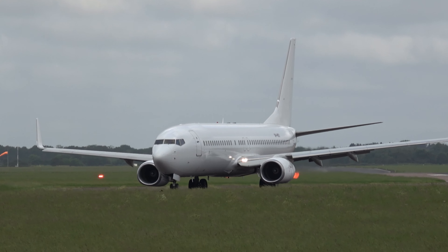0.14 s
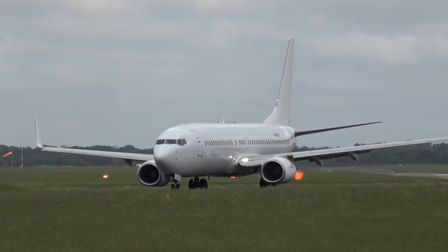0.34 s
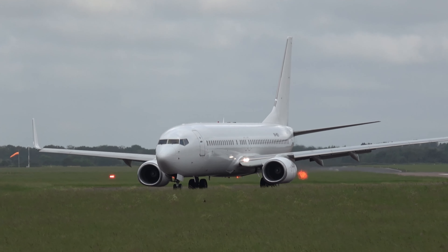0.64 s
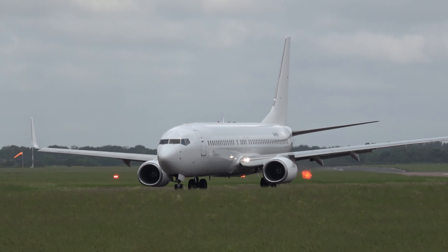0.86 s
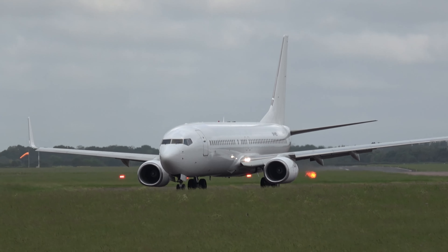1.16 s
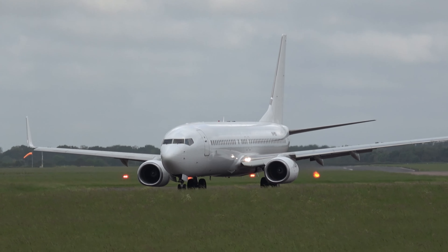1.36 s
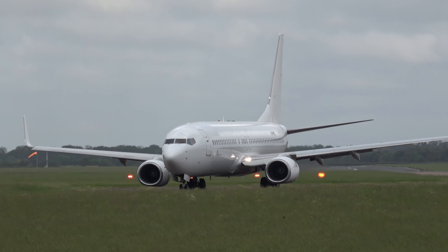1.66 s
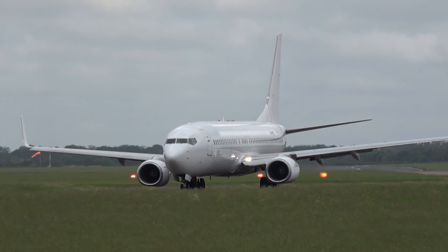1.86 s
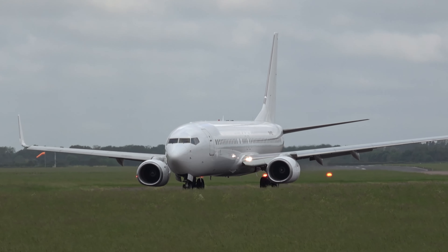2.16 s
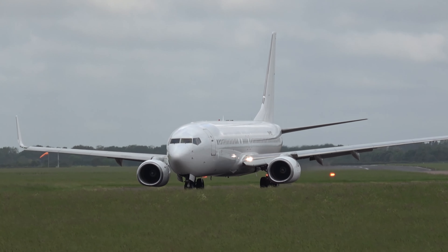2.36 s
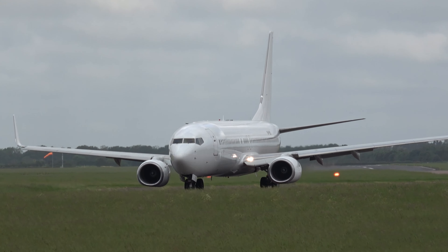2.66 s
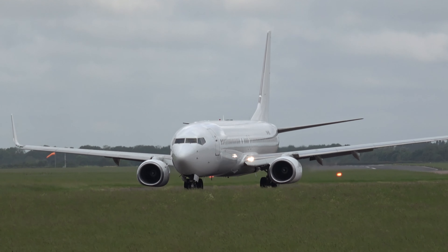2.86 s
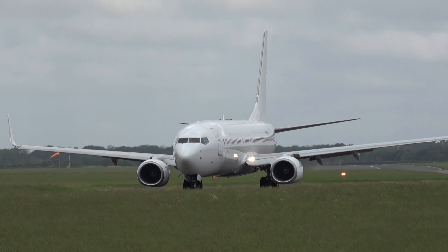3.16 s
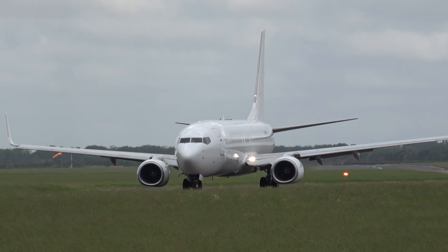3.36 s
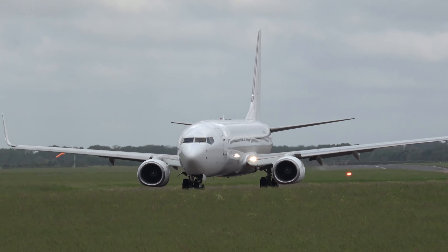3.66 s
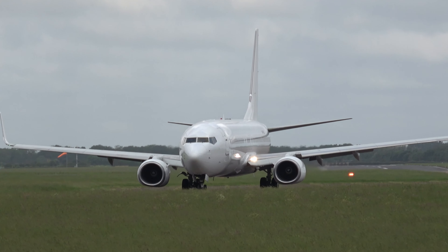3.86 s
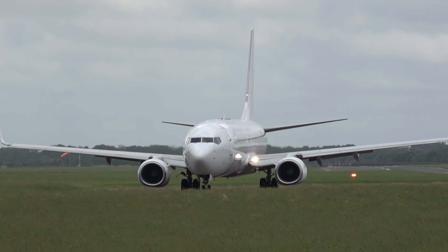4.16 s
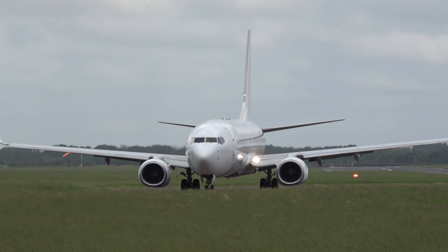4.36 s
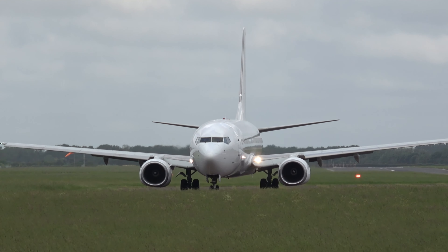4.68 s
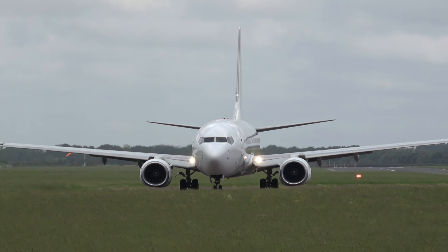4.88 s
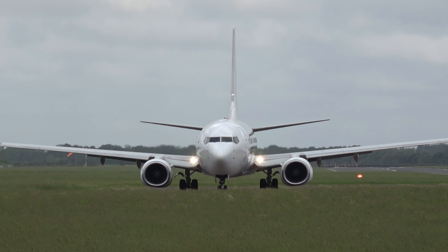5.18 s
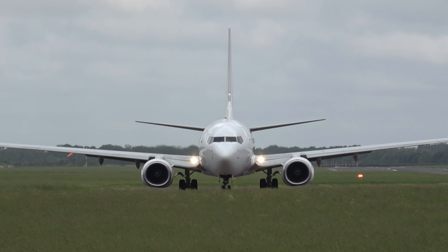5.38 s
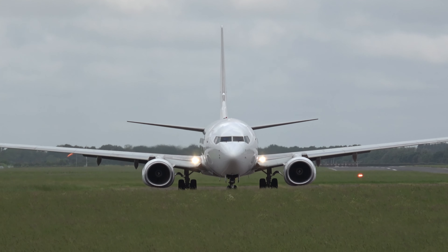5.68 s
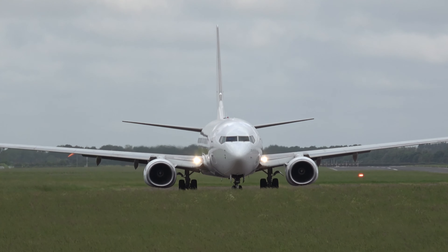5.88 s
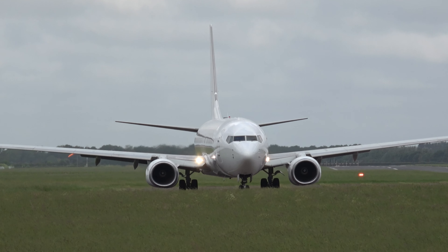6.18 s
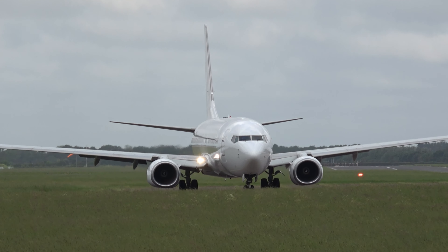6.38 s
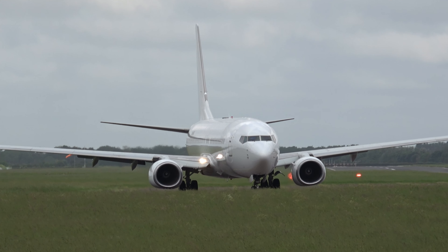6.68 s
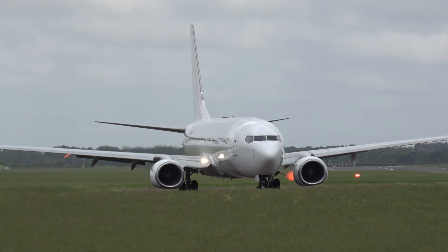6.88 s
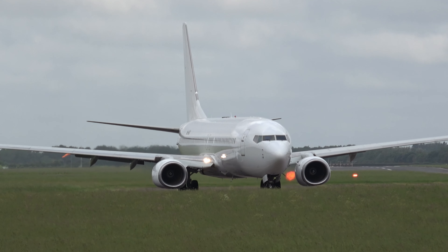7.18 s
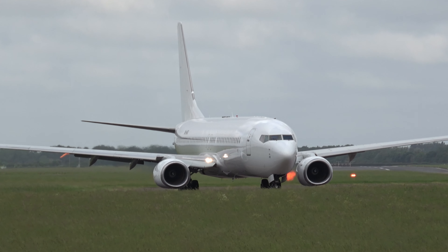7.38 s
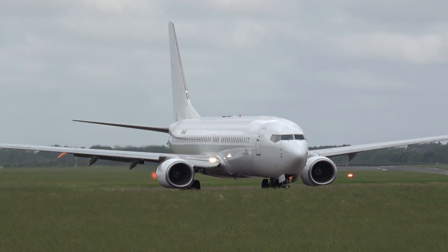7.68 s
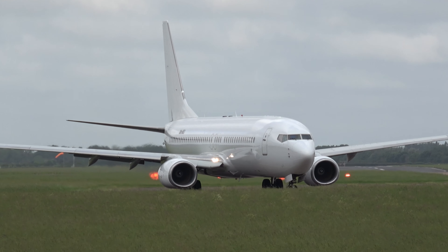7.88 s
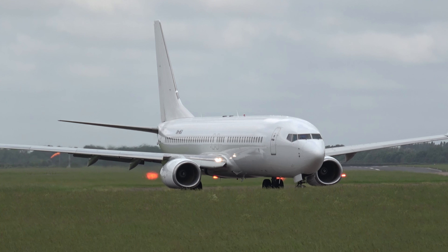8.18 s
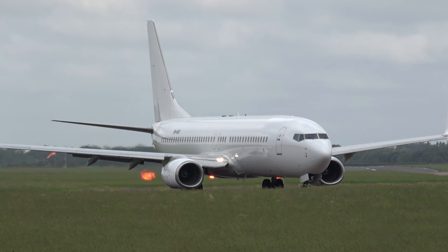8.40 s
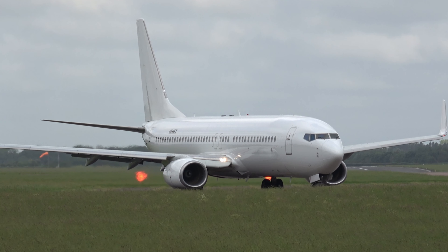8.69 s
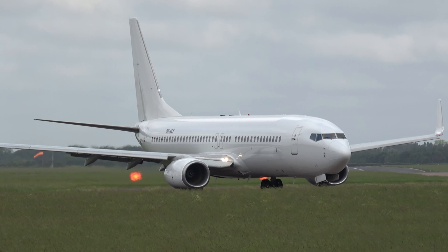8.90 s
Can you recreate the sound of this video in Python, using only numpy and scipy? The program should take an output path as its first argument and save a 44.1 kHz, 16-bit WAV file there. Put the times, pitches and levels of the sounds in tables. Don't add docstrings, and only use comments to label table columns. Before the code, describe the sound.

A twin-engine passenger jet taxis and turns across a grassy airfield, steady turbofan rush and thin whine, with heavy low wind gusts thumping the microphone.

```python
import sys
import numpy as np
from scipy import signal
from scipy.fft import rfft, irfft, next_fast_len
from scipy.io import wavfile
from scipy.ndimage import uniform_filter1d, minimum_filter1d, map_coordinates

SR = 44100
rng = np.random.default_rng(int(sys.argv[2]) if len(sys.argv) > 2 else 0)


def gain_from_db(level_db):
    decades = np.asarray(level_db, float) / 20
    return 10 ** decades


def waveform_to_disk(signal):
    frames = np.transpose(np.atleast_2d(signal))
    scaled = np.clip(frames, -1, 1) * 32767
    samples = np.round(scaled).astype(np.int16)
    wavfile.write(sys.argv[1], SR, samples)


N = 398663


def along(points, hz):
    point_hz, value = np.transpose(points)
    return np.interp(np.log(hz + 1), np.log(point_hz + 1), value)


def unit(x):
    return x / np.sqrt(np.mean(x ** 2) + 1e-20)


def curves(rows):
    time_s, *columns = np.transpose(rows)
    return [np.interp(np.arange(N) / SR, time_s, column) for column in columns]


def wobble(rate_hz):
    knots = rng.standard_normal(int(N * rate_hz / SR) + 4)
    return map_coordinates(knots, [np.arange(N) * rate_hz / SR])


def filtered(x, response):
    size = next_fast_len(N + 8192)
    spectrum = rfft(x, size) * response(np.fft.rfftfreq(size, 1 / SR))
    return irfft(spectrum, size)[..., :N]


def coloured_noise(colour):
    return filtered(rng.standard_normal(N), lambda hz: gain_from_db(along(colour, hz)))


def patchy(patchy_db):
    z = signal.stft(rng.standard_normal(N), nperseg=512)[2]
    field = uniform_filter1d(rng.standard_normal(z.shape), 6, 0)
    field = uniform_filter1d(field, 16, 1)
    return signal.istft(z * gain_from_db(patchy_db * unit(field)), nperseg=512)[1][:N]


def rush(colour, edges_hz, levels_db, patchy_db, flutter_db):
    edges = np.array(edges_hz)[:, None]

    def response(hz):
        above = (edges[:-1] / (hz + 1)) ** 24
        below = (hz / edges[1:]) ** 24
        return gain_from_db(along(colour, hz)) / np.sqrt((1 + above) * (1 + below))

    parts = filtered(patchy(patchy_db), response)
    flutter = gain_from_db(flutter_db * wobble(9))
    return flutter * sum(gain_from_db(db) * unit(part) for db, part in zip(levels_db, parts))


def whine(hz, level_db, waver_hz, fade_db):
    turns = np.cumsum(hz + waver_hz * wobble(12)) / SR
    return gain_from_db(level_db + fade_db * wobble(7)) * np.sqrt(2) * np.sin(2 * np.pi * turns)


# time_s, level_db
EXHAUST = [(0.0, -29), (0.83, -31), (2.92, -27), (2.99, -30), (6.97, -31), (7.4, -33), (8.81, -29.5),
           (8.96, -34), (9.04, -26)]
CORE_LEVELS = [-48.5, -40.5, -37.5]
# freq_hz, density_db_per_hz
CORE_COLOUR = [(18, -29), (30, 10.5), (43, 1.5), (96, -0.5), (150, -4), (194, -13.5), (223, -18),
               (254, -17.5), (367, -16), (461, -12.5), (547, -12), (900, -2.5), (1170, -33), (1980, -120)]


def core_roar():
    rumble_db, = curves(EXHAUST)
    levels_db = [rumble_db, *CORE_LEVELS]
    return rush(CORE_COLOUR, [45, 210, 350, 560, 800], levels_db, patchy_db=0.96, flutter_db=0.03)


# pitch_hz, waver_hz, level_db (over rumble)
SHAFTS = [(100, 8, -9), (147, 3, -12)]


def shaft_hum():
    rumble_db, = curves(EXHAUST)
    return sum(whine(hz, rumble_db + db, waver_hz, fade_db=1.5) for hz, waver_hz, db in SHAFTS)


FAN_LEVELS = [-29, -29.5, -31]
# freq_hz, density_db_per_hz
FAN_COLOUR = [(600, -16), (800, -2.5), (1080, -1), (1300, -5.5), (1550, -0.5), (1900, -6.5), (2300, 0.5),
              (2600, 3), (2720, -5), (3300, -3.5)]


def fan_rush():
    return rush(FAN_COLOUR, [850, 1300, 1948, 2860], FAN_LEVELS, patchy_db=1.1, flutter_db=0.42)


INLET_LEVELS = [-31, -38, -54.5]
# freq_hz, density_db_per_hz
INLET_COLOUR = [(2600, 8), (3000, 1.5), (3450, -3.5), (3780, -3.5), (4100, -9.5), (4800, -11),
                (5400, -15.5), (6600, -29.5), (7600, -32), (8600, -42), (9500, -51.5), (11000, -90.5)]


def inlet_hiss():
    return rush(INLET_COLOUR, [2864, 4100, 6160, 12000], INLET_LEVELS, patchy_db=2.0, flutter_db=0.5)


# time_s, pitch_hz, second_db, third_db (multiples, over the rush around them)
NEAR_BLADES = [(0, 1326, -11, -16), (1, 1325, -11, -15), (2.2, 1323, -15, -14), (3.5, 1326, -19, -18),
               (4.5, 1326, -24, -23), (6, 1326, -24, -28), (6.8, 1326, -17, -26), (9.04, 1326, -25, -28)]
FAR_BLADES = [(0, 1300, -30, -30), (3.5, 1300, -26, -30), (4.5, 1300, -18, -27), (5.8, 1300, -18, -27),
              (7.3, 1302, -22, -21), (8, 1301, -24, -16), (8.5, 1316, -24, -18), (9.04, 1318, -24, -18)]


def blade_tones():
    sound = 0
    for blade_hz, second_db, third_db in (curves(NEAR_BLADES), curves(FAR_BLADES)):
        sound = sound + whine(2 * blade_hz, FAN_LEVELS[2] + second_db, waver_hz=4, fade_db=3)
        sound = sound + whine(3 * blade_hz, INLET_LEVELS[0] + third_db, waver_hz=5, fade_db=3)
    return sound


# time_s, pitch_hz, level_db (over hiss)
STAGE = [(0, 5461, -18), (1, 5460, -12), (3, 5460, -16), (4.3, 5466, -21), (5, 5463, -18), (7, 5460, -20),
         (9.04, 5458, -18)]


def compressor_tone():
    stage_hz, stage_db = curves(STAGE)
    return whine(stage_hz, INLET_LEVELS[1] + stage_db, waver_hz=5, fade_db=3.5)


# time_s, level_db (over rush)
HEAD_ON = [
    (0, -27),
    (2.8, -24),
    (3.5, -12.5),
    (5.8, -15.5),
    (6.6, -17),
    (9.04, -28.5),
]
# pitch_hz, level_db
DUCT = [(2562, 0.5), (3765, -4.5)]


def duct_howl():
    facing_db, = curves(HEAD_ON)
    return sum(whine(hz, FAN_LEVELS[2] + facing_db + db, waver_hz=16, fade_db=4) for hz, db in DUCT)


def engines():
    flow = core_roar() + fan_rush() + inlet_hiss()
    return flow + blade_tones() + shaft_hum() + compressor_tone() + duct_howl()


def lens(eddies, octaves, hz, t):
    time_s, centre_hz, length_s, gain_db = np.transpose(eddies)
    across = np.exp(-(np.log2((hz[:, None] + 1) / centre_hz) / octaves) ** 2)
    passing = np.exp(-((t - time_s[:, None]) / length_s[:, None]) ** 2)
    return (across * gain_db) @ passing


# time_s, pitch_hz, length_s, gain_db
WIDE_SWELLS = [(0.0, 290, 0.42, 2.5), (0.68, 3770, 1.55, -5.0), (0.92, 1080, 0.57, 5.0),
               (1.64, 3520, 0.15, -2.5), (1.92, 1240, 0.22, -6), (2.28, 360, 0.83, 6),
               (3.56, 2320, 0.35, 11.0), (3.64, 4640, 0.23, 4.5), (4.44, 2860, 0.27, 4.0),
               (4.68, 1760, 0.091, 4.5), (5.08, 5340, 0.28, -5.5), (5.4, 1080, 0.76, -8),
               (5.96, 4640, 0.13, -3.5), (6.36, 5340, 0.15, 4.5), (6.76, 2020, 0.26, 5),
               (7.84, 240, 0.42, -6.0), (8.4, 5340, 0.063, 6.5), (8.6, 2860, 0.072, -7.5),
               (8.88, 1080, 0.63, -5.5), (8.96, 3520, 0.18, -4.5),
               (2.0, 2330, .07, 4), (3.64, 950, .1, -2), (3.72, 3900, .08, 2), (3.92, 3310, 0.12, -2.5),
               (4.32, 150, 0.17, 4.5), (4.32, 5040, 0.062, 5), (4.56, 5010, 0.092, -3),
               (5.24, 2360, .07, 2), (5.84, 3310, .1, -3.5), (6.82, 2200, 0.14, 1), (8.36, 3100, .08, 1),
               (8.76, 1080, 0.077, -1.5)]
MEDIUM_SWELLS = [(0.04, 2320, 0.1, -1), (0.28, 7550, 1.7, -3), (0.32, 996, 0.49, 3), (2.12, 503, 0.33, 5),
                 (2.52, 2050, 0.17, 6), (3.16, 1550, 0.3, 5.0), (3.28, 2670, 0.17, -3.5),
                 (3.28, 6100, 0.17, 5.0), (3.32, 660, 0.76, 5.5), (3.36, 1080, 0.11, 5),
                 (3.8, 1300, 0.28, 3.5), (4.68, 218, 0.07, 10), (4.8, 920, 0.22, -4.5),
                 (5.32, 244, 0.36, -7.5), (5.64, 2670, 0.13, 7), (5.92, 700, 0.91, 4),
                 (5.96, 1220, 0.19, -4.5), (6.28, 2040, 0.07, -9), (6.48, 290, 0.15, 11),
                 (6.52, 2280, 0.081, 2.5), (6.92, 250, 0.084, 9), (6.92, 1160, 0.19, 5),
                 (7.24, 4600, 0.063, 8.5), (7.28, 1330, 0.13, -2), (7.64, 1550, 0.21, 3.5),
                 (7.92, 3060, 0.22, -8.5), (8.32, 440, 0.33, -3.5), (8.56, 240, 0.1, 7)]
NARROW_SWELLS = [(0.08, 2340, 0.1, -4.0), (0.36, 2200, 0.1, 2.5), (0.6, 2530, 0.07, -3),
                     (1.16, 2370, 0.55, -3), (1.24, 1650, 0.17, 6.0), (1.56, 724, 0.15, -8),
                     (1.56, 1870, 0.12, -4), (1.8, 1440, 0.11, 4.0), (2.12, 1540, 0.1, -6), (2.44, 670, 0.16, -6),
                     (2.48, 2510, 0.07, 6), (2.56, 1170, 0.17, 5.5), (2.76, 480, 0.11, -9),
                     (3.48, 2880, 0.063, -3.5), (3.72, 2300, 0.06, 5.5), (4.36, 1540, 0.1, -1.5),
                     (5.68, 4660, 0.087, 6), (6.04, 1020, 0.07, -5.0), (6.12, 1340, 0.22, 1.5),
                     (6.36, 840, 0.1, 6), (6.68, 1040, 0.1, 6), (6.92, 2060, 0.13, 3), (6.92, 3550, 0.082, -4.5),
                     (7.6, 1090, 0.17, -2.5), (7.76, 2260, 0.43, -2), (8.36, 1440, 0.22, 2.5),
                     (8.4, 1090, 0.077, -3),
                     (1.6, 1080, .15, 2.5), (4.63, 1650, 0.051, 3.1), (6.29, 1400, 0.065, 4), (6.42, 3200, 0.079, 3),
                 (4.25, 2500, .2, 2), (6.32, 2050, .09, 3.5), (4.93, 2530, .35, 1.5), (8.4, 3600, .06, 2),
                 (3.68, 4300, .1, 2), (4.5, 2950, .1, -1.5)]
# freq_hz, level_db
APART = [(400, -62.5), (700, -38.5), (1500, -24.5), (4000, -15), (7000, -12), (9000, -6.5)]


def through_air(sound):
    hz, t, z = signal.stft(sound, SR, nperseg=1024)
    gain_db = lens(WIDE_SWELLS, 0.76, hz, t)
    gain_db = gain_db + lens(MEDIUM_SWELLS, 0.36, hz, t)
    gain_db = gain_db + lens(NARROW_SWELLS, 0.18, hz, t)
    z = z * gain_from_db(gain_db)
    random_phase = np.exp(2j * np.pi * rng.random(z.shape))
    scatter = z * gain_from_db(along(APART, hz))[:, None] * random_phase
    return signal.istft(np.array([z, scatter]), SR, nperseg=1024)[1][:, :N]


# start_s, hold_s, level_db
GUSTS = [(0, 0.15, -9), (0.337, 0.29, -18.5), (0.704, 0.043, -10.5), (1.12, 0.28, -21.5),
         (1.43, 0.039, -12), (1.54, 0.36, -21), (2.08, 0.52, -13), (2.74, 0.063, -5.5), (2.85, 0.13, -13.5),
         (3.05, 0.11, -20.5), (3.35, .15, -29.5), (3.617, 0.22, -31.5), (4.043, 0.088, -11.5),
         (4.145, 0.53, -14), (4.672, 0.074, -9), (4.85, 0.12, -25.5), (5.565, 0.051, -12),
         (5.694, 0.16, -10.5), (5.973, .15, -18), (6.15, .1, -13), (6.3, 0.089, -15.5), (6.464, 0.15, -8),
         (6.893, .08, -10.5), (7.1, 0.05, -21), (7.206, 0.12, -13.5), (7.42, 0.088, -24),
         (7.66, 0.036, -22.5), (8.311, 0.04, -14), (8.512, 0.095, -9), (8.72, 0.11, -23.5)]


def gusts():
    calm_db, rise_db_per_s, fall_db_per_s = -33, 323, 150
    t = np.arange(0, N / SR + .01, .005)
    power = gain_from_db(2 * calm_db)
    for start_s, hold_s, level_db in GUSTS:
        rise_db = rise_db_per_s * np.maximum(start_s - t, 0)
        fall_db = fall_db_per_s * np.maximum(t - start_s - hold_s, 0)
        power = power + gain_from_db(2 * (level_db - rise_db - fall_db))
    return np.interp(np.arange(N) / SR, t, 10 * np.log10(power))


# freq_hz, density_db_per_hz
BUFFET = [(1.5, -40), (4, -7), (9, -1), (15, 1), (26, -5), (40, -13), (64, -22), (100, -34), (200, -64),
          (400, -120)]


def wind():
    push = coloured_noise(BUFFET)
    power = uniform_filter1d(uniform_filter1d(push ** 2, 3000), 3000)
    swell = np.sqrt(np.abs(power))
    even_push = unit(push / (swell + 0.16 * np.mean(swell)))
    blows = gain_from_db(uniform_filter1d(gusts(), 1200)) * even_push
    return .85 * np.tanh(blows / .85)


# time_s, peak_db, length_ms
OVERLOADS = [(2.7622, -46, 4), (6.469, -46, .6), (6.5065, -59, .6), (6.5213, -46, .6), (6.5295, -58, .8),
             (6.91, -50, 1), (7.194, -66, 2), (8.09, -63, 2)]


def overloads():
    ticks, t = np.zeros(N + 600), np.arange(600) / SR
    for time_s, peak_db, length_ms in OVERLOADS:
        start = round(time_s * SR)
        bump = np.sin(np.pi * np.clip(t * 1000 / length_ms, 0, 1)) ** 2
        ticks[start:start + 600] += gain_from_db(peak_db + 0.5) * bump * rng.standard_normal(600)
        ticks[round((time_s + length_ms / 2000) * SR)] += gain_from_db(peak_db + 10)
    colour = [(3000, -26), (6000, 9), (11000, 6), (15000, 4), (16500, -38.5)]  # Hz, dB
    return filtered(ticks[:N], lambda hz: gain_from_db(along(colour, hz)))


def port_lag(hz):
    side = np.array([[-1], [1]])
    return np.exp(np.pi * 1j * hz * .92 / SR * side / (1 + (430 / (hz + 1)) ** 4))


def scene():
    jet, scatter = through_air(engines())
    return filtered(jet + overloads(), port_lag) + scatter * np.array([[1], [-1]]) + wind()


# freq_hz, density_db_per_hz
SELF_NOISE = [(5000, -2.5), (9000, -0.5), (12000, -3), (14600, -9), (15400, -26), (16500, -71.5)]


def band_limit(x):
    return signal.sosfilt(signal.butter(12, 16200, fs=SR, output="sos"), x)


def record(dry):
    hiss = gain_from_db(-74.5) * unit(coloured_noise(SELF_NOISE))
    peak = -minimum_filter1d(-np.abs(dry).max(axis=0), 1200)
    gain = uniform_filter1d(np.minimum(1, .98 / (peak + 1e-9)), 600)
    fade_in = np.minimum(np.arange(N) / 10, 1)
    return band_limit(fade_in * gain * dry + hiss)


dry = scene()
out = record(dry)
waveform_to_disk(out)
```